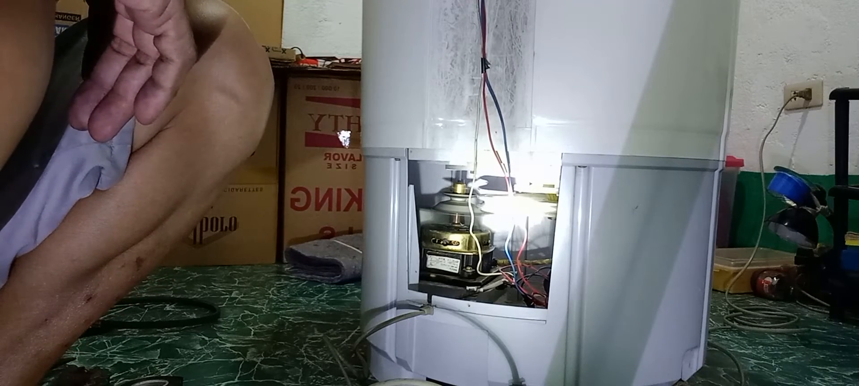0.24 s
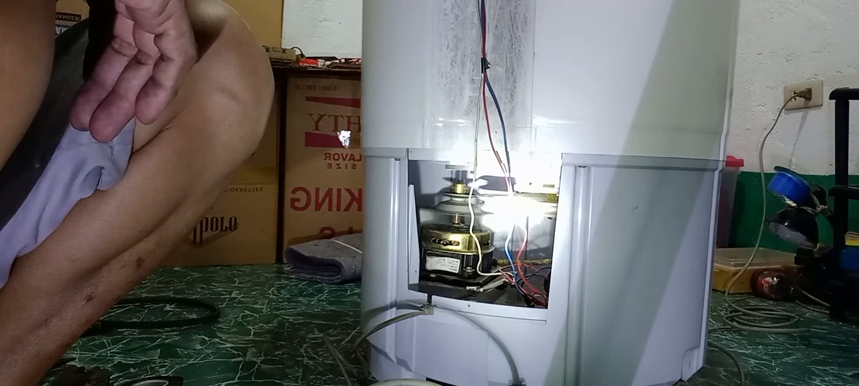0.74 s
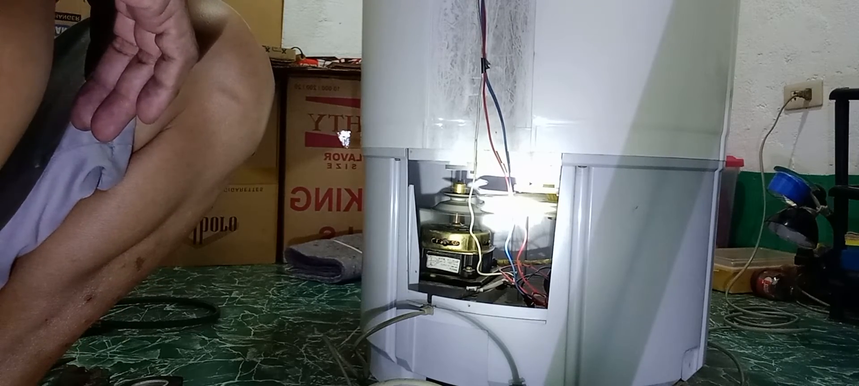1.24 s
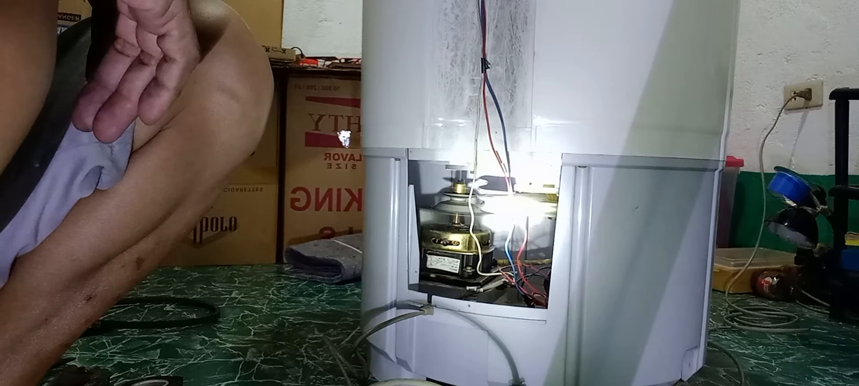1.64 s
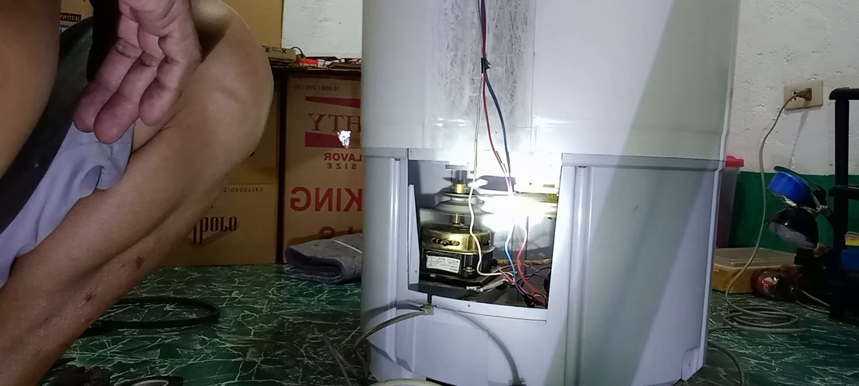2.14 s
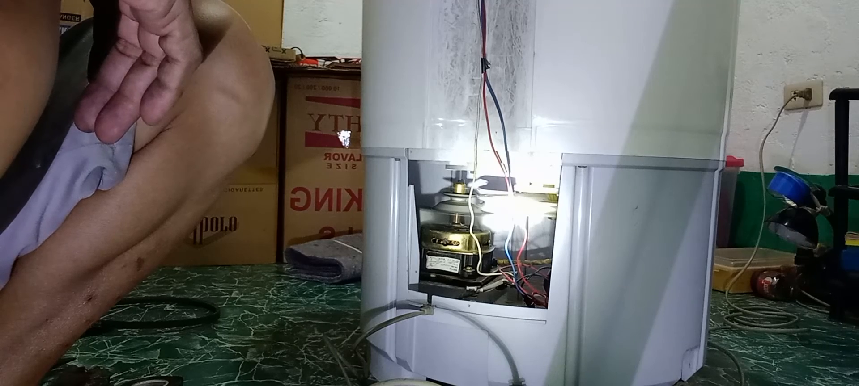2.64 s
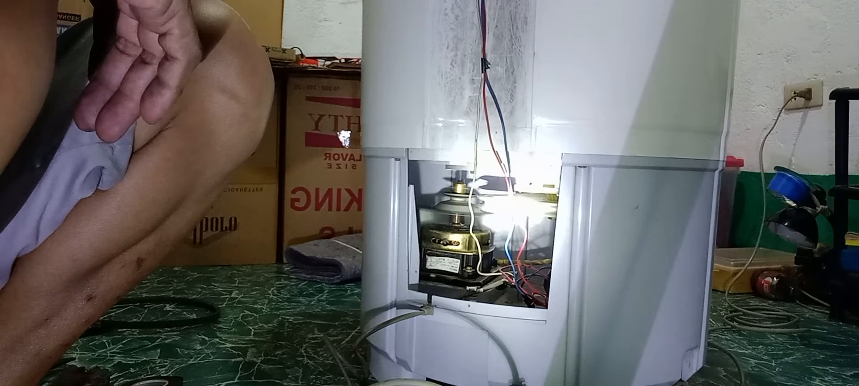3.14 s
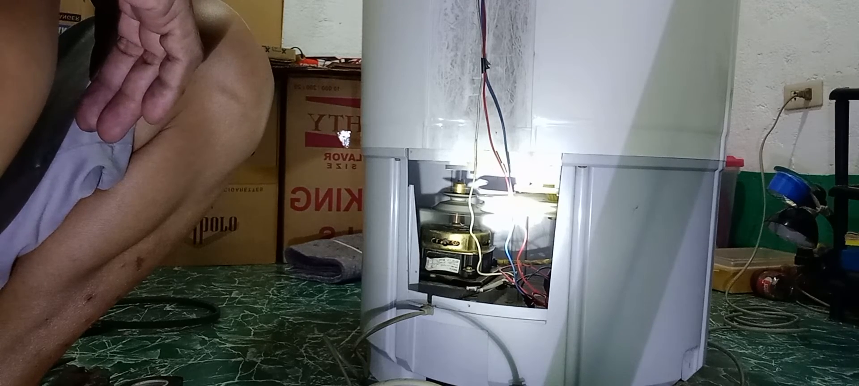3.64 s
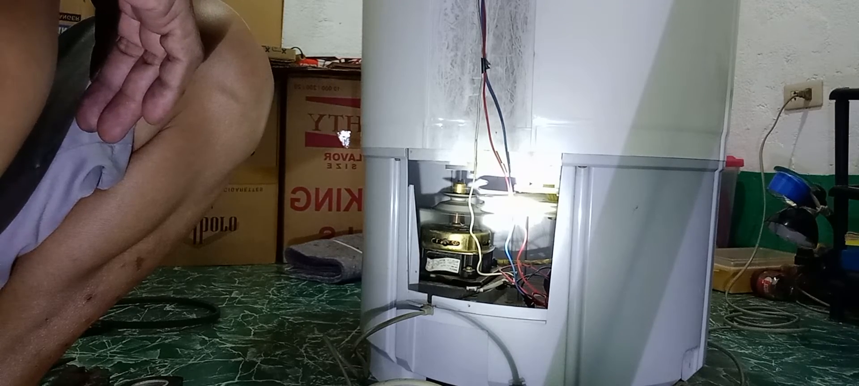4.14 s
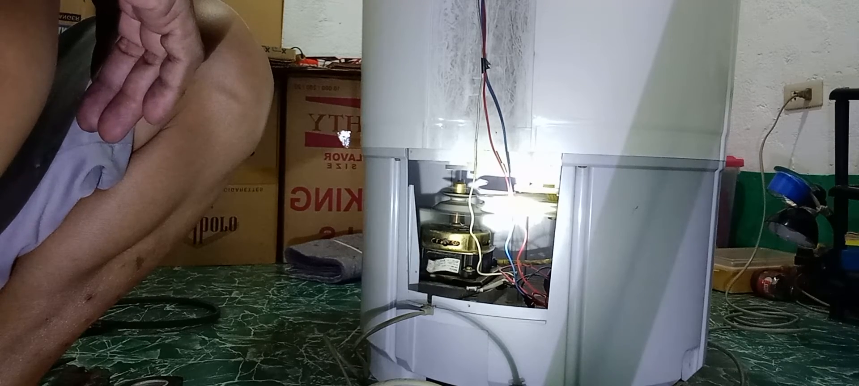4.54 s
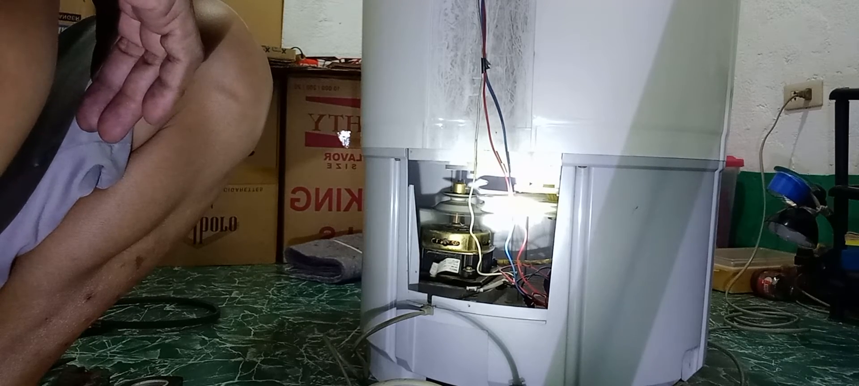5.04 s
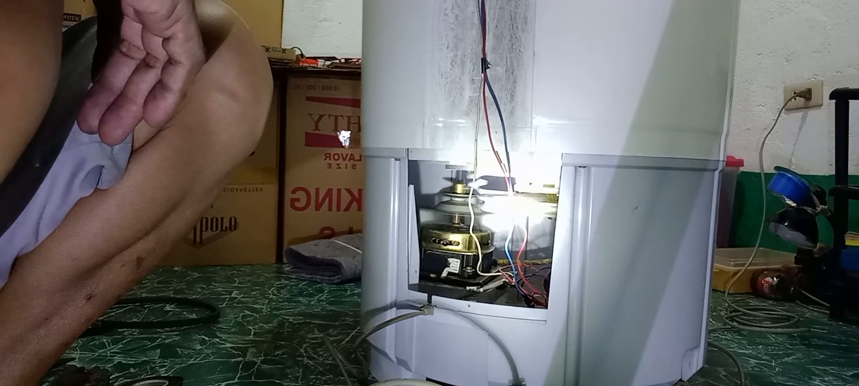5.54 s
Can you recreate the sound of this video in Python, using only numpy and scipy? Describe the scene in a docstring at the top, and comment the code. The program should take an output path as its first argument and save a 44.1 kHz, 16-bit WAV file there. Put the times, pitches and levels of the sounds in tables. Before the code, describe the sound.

A washing machine runs close to the microphone in a small workshop with a slight, short echo. From the start its motor gives a loud, steady, low electric hum, with a faint whirr of air and bearings beneath it. At about 2.8 seconds the hum cuts off abruptly and the cabinet gives a brief, low, throbbing ring. A much quieter stretch follows, in which the belt chirps faintly and rapidly, slowing a little until about 3.6 seconds, then picking up speed. From around 4 seconds the high chirping, about fourteen squeaks a second, grows louder together with the low drone and rumble of the turning tub and an airy rush. Hollow booms swell from the panels several times between 4.7 and 5.2 seconds, and again at 5.6. The chirping, rumble and rush hold until the end, near 6 seconds, still softer than the opening hum.

```python
"""A steady hum stops with a short ring; then quick chirps, a rumble and a rush grow louder.
It is a washing machine on test in a small workshop, its motor bay open. The motor hums at twice the
mains rate, with side tones from its turning shaft, until the timer cuts it and the cabinet rings out.
The belt rolls on, slows, then gathers speed, chirping once a lap while the tub rumbles and rushes."""
import sys
import numpy as np
from scipy import signal
from scipy.fft import rfft, irfft, next_fast_len
from scipy.io import wavfile

SR = 44100
rng = np.random.default_rng(int(sys.argv[2]) if len(sys.argv) > 2 else 0)


def waveform_to_disk(signal):
    """Save audio, clipped to [-1, 1], as 16-bit WAV at the path in sys.argv[1]."""
    frames = np.transpose(np.atleast_2d(signal))
    scaled = np.clip(frames, -1, 1) * 32767
    samples = np.round(scaled).astype(np.int16)
    wavfile.write(sys.argv[1], SR, samples)


N = 255780
T = np.arange(N) / SR

PULL_HZ, SHAFT_HZ = 119.85, 29.55  # the motor's magnetic pulls and shaft turns per second
CUT_S, CUT_FADE_S = 2.7635, 0.011  # the timer switches the motor off
# how fast the belt runs: t/s, speed/(laps per s)
BELT_SPEED = [(0.0, 13.65), (2.7, 12.11), (3.2, 11.33), (3.6, 9.68), (3.9, 14.05), (4.6, 14.64),
              (5.2, 13.93), (5.8, 12.98)]


def motor():
    """The iron is pulled twice a mains cycle; the off-centre rotor adds side tones and a faint buzz."""
    # tones of the hum: multiple of the pull rate, shaft rates added, level/dB
    hum_tones = [(1, 0, -9), (1, 1, -30), (2, -1, -47.5), (2, 0, -46), (2, 1, -40.5), (2, 2, -53.5),
                 (3, -1, -40), (3, 0, -32.5), (3, 1, -49.5), (3, 2, -50), (4, -1, -50), (4, 0, -55),
                 (4, 1, -49.5), (5, -1, -61), (5, 1, -60), (6, 2, -57), (7, 0, -49), (7, 1, -59)]
    # whirr of air and bearings: f/Hz, relative level/dB
    whirr_spectrum = [(25, -28), (50, -17.5), (75, 1), (165, 0.5), (220, -15.5), (490, -10), (540, -22.5),
                      (860, -24), (1100, -31.5), (1900, -34.5), (3100, -41), (5000, -49), (7000, -61),
                      (15000, -69)]
    hum = sum(from_db(db) * motor_tone(round(pulls), round(turns), waver=0.19)
              for pulls, turns, db in hum_tones)
    buzz = sum(motor_tone(pulls, turns, waver=0.47) * from_db(-2.5 * max(pulls - 6, 0))
               for pulls in range(5, 9) for turns in range(-2, 2))
    upper = from_db(-61) * buzz + from_db(-36.5) * noise(whirr_spectrum) + bearing() + rattle()
    power = .5 - .5 * np.tanh((T - CUT_S) / CUT_FADE_S)
    # the upper sounds linger in the room for a moment
    lingering = from_db(-60 * np.maximum(T - CUT_S, 0) / 0.14)
    return hum * power + upper * lingering


def motor_tone(pulls, turns, waver):
    """One tone of the hum: locked to the mains, or wavering with the shaft if it is a side tone."""
    # stereo width of the hum: f/Hz, side minus mid/dB
    hum_width = [(100, -36.5), (360, -32), (550, -7.5), (850, -6)]
    hz = pulls * PULL_HZ + turns * SHAFT_HZ
    phase = 2 * np.pi * (hz * T + rng.random()) + waver * turns * drift(0.93)
    side = from_db(at_hz(hum_width, hz)) * rng.choice([-1, 1]) * np.cos(phase)
    return np.sqrt(2) * stereo(np.sin(phase), side) * from_db(0.23 * pulls * drift(10))


def cabinet():
    """Let go by the motor, the panels swing out; two close tones throb together as they die."""
    # ringing tones of the panels: f/Hz, level/dB, time to fade by 60 dB/s
    panel_tones = [(101.5, -14, 0.32), (126.6, -17.5, .26), (233, -29, 0.18), (462, -46, 0.14)]
    t = np.maximum(T - CUT_S - .012, 0)
    rings = sum(from_db(db - 60 * t / fade_s) * np.sin(2 * np.pi * hz * t) * (-1) ** k
                for k, (hz, db, fade_s) in enumerate(panel_tones))
    return rings * (1 - np.exp(-t / 0.0057))


def tub():
    """The turning tub drones at a steady pitch, booms through its panels and rushes louder."""
    # tones of the drone: multiple of the tub's turning rate, relative level/dB
    drone_tones = [(2, -1), (4, 0), (5, -10.5), (6, -6), (7, -12.5), (8, -13)]
    # surges in which the panels boom: t/s, length/s, level/dB
    booms = [(2.958, 0.034, -36.5), (3.126, 0.084, -42), (3.87, 0.056, -39.5), (4.228, .04, -38),
             (4.66, 0.075, -27.5), (4.782, 0.057, -22), (4.969, 0.062, -20.5), (5.164, 0.049, -23),
             (5.606, 0.11, -24.5), (5.77, 0.034, -33)]
    # the tub's low rumble and airy rush: f/Hz, relative level/dB
    rumble_spectrum = [(25, -29), (45, -14.5), (70, -1.5), (98, 4.5), (130, -0.5), (160, -1), (190, -8.5),
                       (235, -0.5), (290, -4.5), (345, -1), (395, -12), (475, -5), (560, -16.5),
                       (800, -29.5), (1500, -45.5)]
    rush_spectrum = [(200, -9.5), (600, 7.5), (850, 7), (1150, 3), (1500, 4.5), (2300, 1.5), (3200, -5.5),
                     (4000, -8), (5500, -13.5), (6900, -17.5), (7900, -15.5), (8600, -19), (9700, -16),
                     (15500, -20)]
    tub_hz, boom_hz, lean_left_db = 37.32, 112.8, 2.2
    drone = sum(from_db(db) * rough_tone(round(k) * tub_hz, width_hz=3 * k, evenness=0.34)
                for k, db in drone_tones)
    drone *= driven(-34, follows=0.53) * from_db(-3.5 * belt_slowness())  # fades when the belt is slow
    surges = sum(from_db(db) * swell(s, length) for s, length, db in booms)
    boom = surges * rough_tone(boom_hz, width_hz=12.8, evenness=0.93)
    boom += driven(-34.5, follows=0.73) * rough_tone(boom_hz, width_hz=33)
    body = drone + boom
    low = body + from_db(-16.5) * workshop(body) + driven(-34, follows=0.61) * noise(rumble_spectrum)
    # most of the rush comes back from the walls, a little straight from one side
    rush = noise(rush_spectrum) + from_db(-9.5) * from_the_right(noise(rush_spectrum)[0], samples=16)
    rush *= driven(-40, follows=1.02) * from_db(.5 * drift(16))
    rush *= from_db(-6.5 * (T < CUT_S))  # in the background until the cut
    return low * from_db([[lean_left_db / 2], [-lean_left_db / 2]]) + rush


def belt():
    """The belt rubs on its pulley; once a lap its tension lets go and the squeal drops in pitch."""
    # one lap of the belt: share of the lap, squeal f/Hz, grip level/dB
    one_lap = [(0, 1700, -4), (.08, 1720, 1), (.17, 1650, 5), (.26, 1420, 4), (.38, 1370, -2),
               (.5, 1335, 3), (.7, 1450, -2), (.84, 1600, -11)]
    # the belt slips and sings louder and higher: t/s, length/s, boost/dB
    slips = [(3.029, .17, 6), (3.851, .11, 5)]
    # rasp of the belt: f/Hz, relative level/dB
    rasp_spectrum = [(1000, -38), (1240, -17.5), (1310, 2), (1480, -4.5), (1620, 2), (1720, -2), (1800, -4),
                     (1900, -23), (2800, -32.5), (3500, -33.5), (3950, -21), (4500, -48)]
    slip_hz, hold_per_db = 1647, 0.4  # the pitch a slipping belt holds on to, and how firmly
    laps = np.cumsum(in_time(BELT_SPEED)) / SR
    share, *columns = np.transpose(one_lap)
    pitch_hz, grip_db = [np.interp(laps, share, column, period=1) for column in columns]
    # a slow or slipping belt sings mostly at the top of its range
    slow_db = 2.1 * belt_slowness() * (pitch_hz - 1570) / 200
    slip_db = sum(db * swell(s, length) for s, length, db in slips)
    early_in_lap = np.maximum(np.cos(2 * np.pi * (laps - .22)), 0)
    grip = from_db(grip_db + slow_db + slip_db * early_in_lap)
    pitch_hz += (slip_hz - pitch_hz) * np.clip(hold_per_db * slip_db, 0, 1)
    squeal = grip * rough_tone(pitch_hz, width_hz=120, evenness=.8)
    rasp = np.sqrt(grip) * noise(rasp_spectrum)
    # half a lap on, its seam scrapes the pulley
    seam = np.maximum(np.cos(2 * np.pi * (laps - .5)), 0) ** 8
    rub = squeal + from_db(-7.5) * seam * rough_tone(3200, width_hz=270)
    return driven(-40.5, follows=1.04) * (from_db(-2) * rub + from_db(-0.8) * workshop(rub) + rasp)


def bearing():
    """The same rough track passes the balls on every turn of the shaft and rings the motor's frame."""
    # ringing tones of the frame: f/Hz, width/Hz, relative level/dB
    frame_tones = [(1550, 47, -66.5), (1740, 150, -61.5), (2470, 85, -64), (3860, 96, -72),
                   (4800, 540, -73.5)]
    count = round(SR / SHAFT_HZ)  # samples in one turn
    turns = SHAFT_HZ * T + .0012 * drift(0.78)
    track = np.interp(turns, np.arange(count) / count, rng.standard_normal(count), period=1)
    grind = track + rng.standard_normal(N)
    grind *= from_db(1.1 * np.cos(2 * np.pi * PULL_HZ * T) + 1.5 * drift(14))
    rings = sum(from_db(db) * rms_one(signal.lfilter(*signal.iirpeak(hz, hz / width, fs=SR), grind))
                for hz, width, db in frame_tones)
    rings = signal.sosfilt(signal.butter(4, 5500, fs=SR, output="sos"), rings)
    return from_db(-2) * rings + from_db(-3.5) * workshop(rings)


def rattle():
    """Loose parts touch at random on the motor's pulls, some much harder than others."""
    # gritty sound of loose parts: f/Hz, relative level/dB
    grit_spectrum = [(1200, -14), (2500, 1), (4000, 1), (5200, -5), (6500, -15), (7700, -8), (9000, -17),
                     (15000, -24)]
    pulls = PULL_HZ * T
    sizes = from_db(4.4 * np.clip(rng.standard_normal(int(pulls[-1]) + 1), -2, 2))
    touches = sizes[pulls.astype(int)] * np.exp(-0.7 * (pulls % 1))
    return from_db(-64.5) * rms_one(touches) * noise(grit_spectrum)


def squeaks():
    """Faint, thin squeaks swell and fade high in the treble."""
    # each squeak: t/s, length/s, f/Hz, width/Hz, relative level/dB
    thin_squeaks = [(3.329, 0.073, 10500, 5000, -65), (3.39, .08, 11150, 260, -67),
                    (3.79, 0.065, 10100, 1500, -69), (4.008, .06, 11350, 600, -65),
                    (4.49, 0.065, 12000, 2600, -58)]
    direct = sum(from_db(db) * swell(s, length) * rough_tone(hz, width)
                 for s, length, hz, width, db in thin_squeaks)
    return .5 * direct + workshop(direct)


def ticks():
    """The shaking machine makes tiny contacts, bright and gone in a few milliseconds."""
    # each contact: t/s, relative level/dB
    contacts = [(.845, -69), (.95, -67.5), (2.06, -64), (2.712, -66)]
    strength = sum(from_db(db) * (T >= s) * np.exp(-np.abs(T - s) / .004) for s, db in contacts)
    direct = strength * rough_tone(10000, width_hz=5500)
    return .5 * direct + workshop(direct)


def workshop(x, fade_s=0.18):
    """The room's echo: dense reflections, different at each ear, that die by 60 dB in fade_s."""
    t = T[:SR // 2]
    tail = rng.standard_normal((2, len(t))) * from_db(-60 * t / fade_s) * (t > .003)
    tail /= np.sqrt(np.sum(tail ** 2, axis=1, keepdims=True))
    return signal.fftconvolve(x[None], tail, axes=1)[:, :N]


def still_air():
    """The air of the workshop is a faint, steady hush."""
    # the hush: f/Hz, relative level/dB
    air_spectrum = [(30, 12), (100, 25.5), (500, 9), (1200, 11.5), (5000, -1), (15000, -7)]
    return from_db(-63.5) * noise(air_spectrum)


def driven(gain_db, follows):
    """Gain of a tub or belt sound: gain_db when loud, moving `follows` dB per dB of the shared curve."""
    # loudness of the tub and belt, dipping and then building: t/s, level/dB
    loudness = [(2.85, -64.5), (3.5, -67.5), (3.84, -67), (4.15, -59), (4.4, -52.5), (4.85, -48.5),
                (5.25, -44.5), (5.8, -44.5)]
    loud_db = -45
    return from_db(gain_db + follows * (in_time(loudness) - loud_db))


def belt_slowness(running_speed=14):
    """Laps per second by which the belt falls short of its running speed, 2 at most."""
    return np.clip(running_speed - in_time(BELT_SPEED), 0, 2)


def noise(spectrum):
    """Stereo noise shaped by a spectrum, narrow in the bass and wide in the treble."""
    # stereo width of the noise: f/Hz, side minus mid/dB
    noise_width = [(60, -8.5), (200, -4.5), (380, -11), (700, 1), (2400, -1.5), (8000, 0.5)]
    size = next_fast_len(N)
    hz = np.arange(size // 2 + 1) * SR / size
    bass_cut = hz ** 2 / (hz ** 2 + 20 ** 2)
    mid, side = rfft(rng.standard_normal((2, size))) * from_db(at_hz(spectrum, hz)) * bass_cut
    mid = irfft(mid, size)[:N]
    side = irfft(side * from_db(at_hz(noise_width, hz)), size)[:N]
    return stereo(mid, side) / np.std(mid)


def rough_tone(hz, width_hz, evenness=0):
    """A ringing tone kept going by random pushes; its pitch may move, and evenness steadies its level."""
    lowpass = signal.butter(2, width_hz / 2, fs=SR, output="sos")
    pushes = rng.standard_normal(N) + 1j * rng.standard_normal(N)
    swing = rms_one(signal.sosfilt(lowpass, pushes))
    swing /= (np.abs(swing) + 0.043) ** evenness
    phase = 2 * np.pi * np.cumsum(hz * np.ones(N)) / SR
    return rms_one(np.real(swing * np.exp(1j * phase)))


def drift(rate_hz):
    """A slow random wander, about 1 in size."""
    step, settle = 40, 2000  # samples per point; points skipped while the filter settles
    r = np.exp(-2 * np.pi * step * rate_hz / SR)
    pushes = rng.standard_normal(N // step + settle + 2)
    slow = signal.lfilter([1], [1, -2 * r, r * r], pushes)[settle:]
    return np.interp(np.arange(N) / step, np.arange(len(slow)), rms_one(slow))


def swell(s, length):
    """A smooth rise and fall around second s, height 1."""
    return np.exp(-2 * ((T - s) / length) ** 2)


def from_the_right(x, samples):
    """The sound reaches the left ear a few samples late."""
    return np.array([np.pad(x, (samples, 0))[:N], x])


def stereo(mid, side):
    """Left and right from what the ears share (mid) and what sets them apart (side)."""
    return np.array([mid + side, mid - side])


def in_time(points):
    """Join (time, value) points into a curve with one value per sample."""
    return np.interp(T, *np.transpose(points))


def at_hz(points, hz):
    """Read between (frequency, value) points, with octaves evenly spaced."""
    f, value = np.transpose(points)
    return np.interp(np.log(np.maximum(hz, 1)), np.log(f), value)


def from_db(db):
    """Turn decibels into a factor to multiply by."""
    return 10 ** (np.asarray(db) / 20)


def rms_one(x):
    """Scale to an average strength (rms) of 1."""
    return x / np.sqrt(np.mean(np.abs(x) ** 2) + 1e-20)


def scene():
    """Motor, cabinet, belt and tub over the still air of the room."""
    powered = (motor() + cabinet()) * from_db([[.45], [-.45]])  # a little to the left
    return powered + ticks() + belt() + tub() + squeaks() + still_air()


def record(dry, cutoff_hz=15500):
    """The sound opens softly and the highest treble is cut steeply."""
    opening = np.sin(np.pi / 2 * np.minimum(T / .012, 1)) ** 2
    lowpass = signal.ellip(10, .1, 80, cutoff_hz, fs=SR, output="sos")
    return signal.sosfilt(lowpass, dry * opening)


dry = scene()
out = record(dry)
waveform_to_disk(out)
```